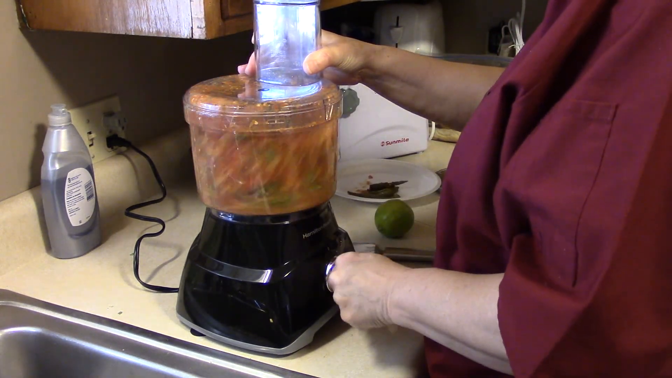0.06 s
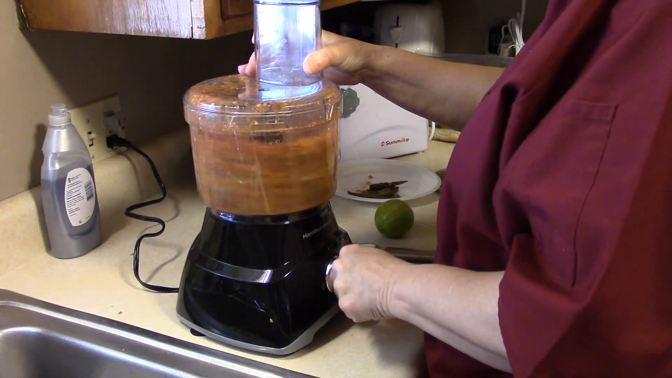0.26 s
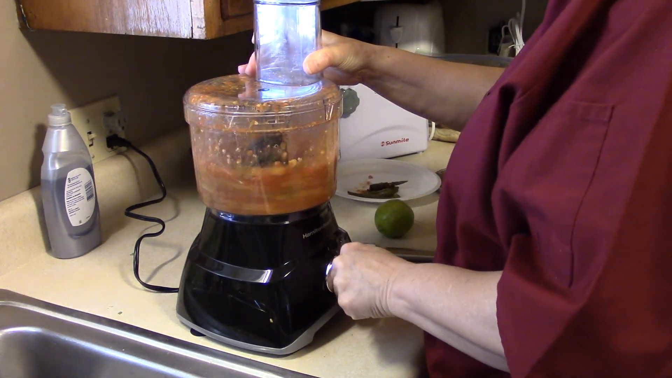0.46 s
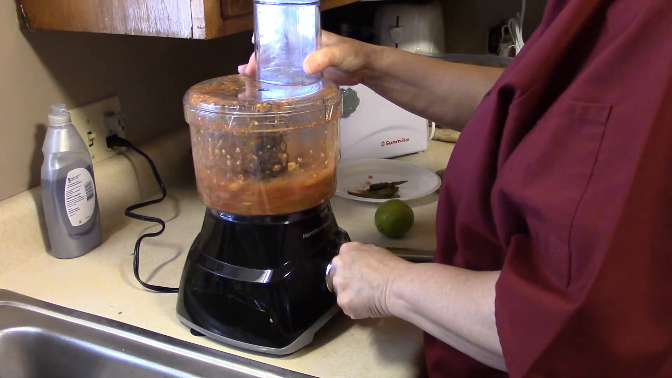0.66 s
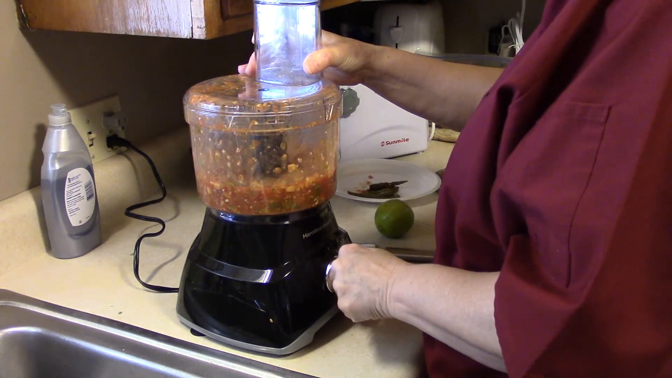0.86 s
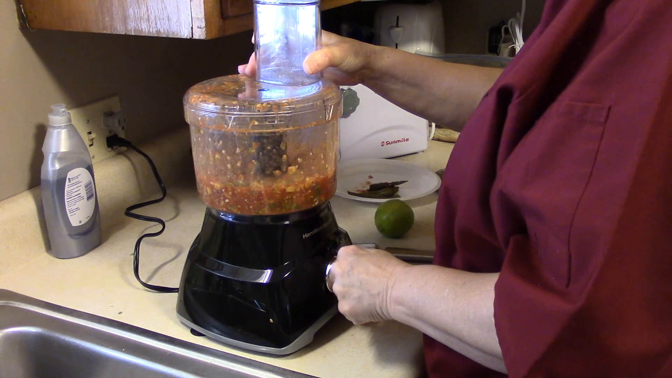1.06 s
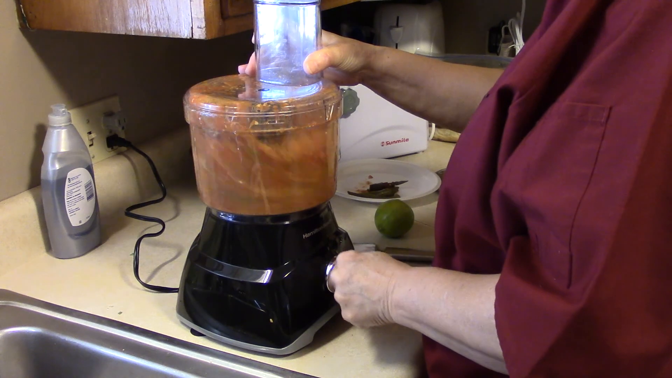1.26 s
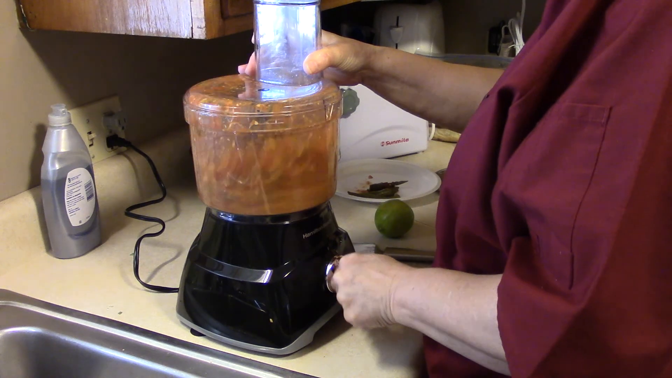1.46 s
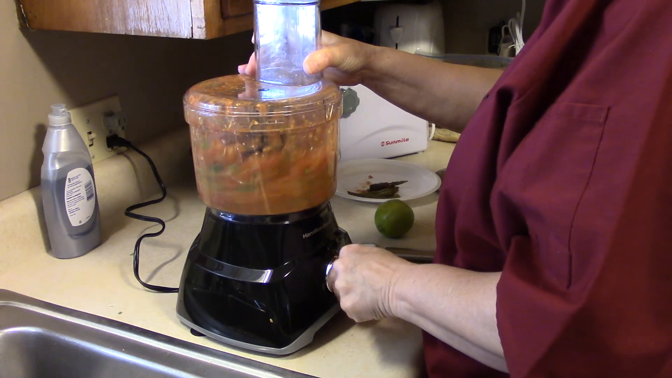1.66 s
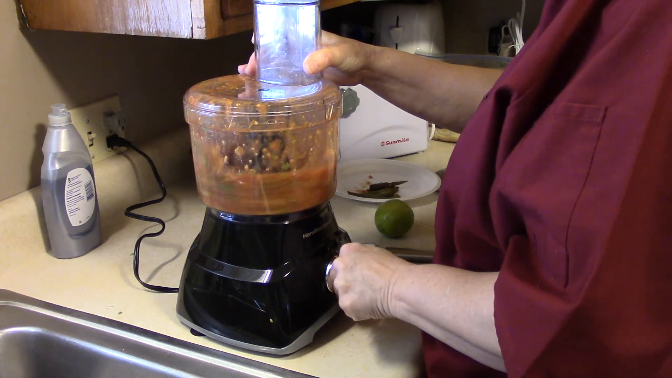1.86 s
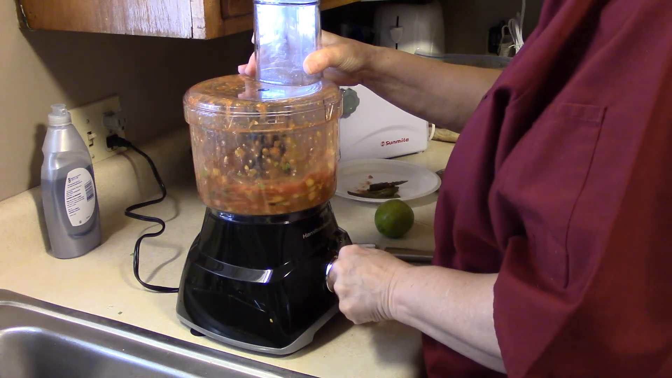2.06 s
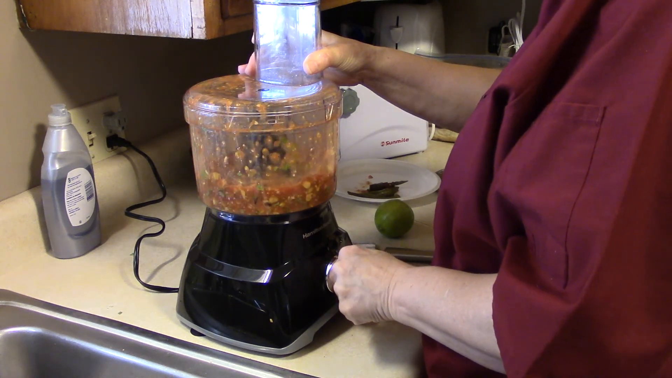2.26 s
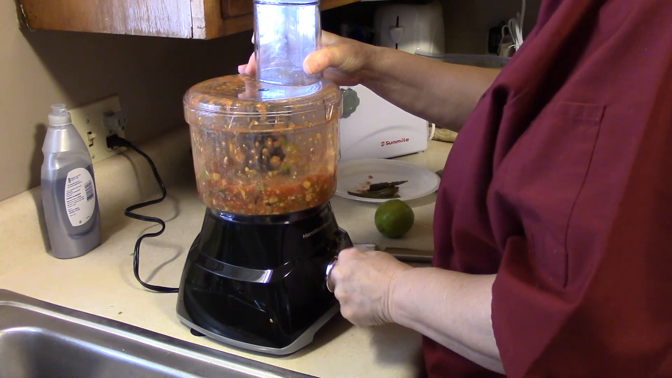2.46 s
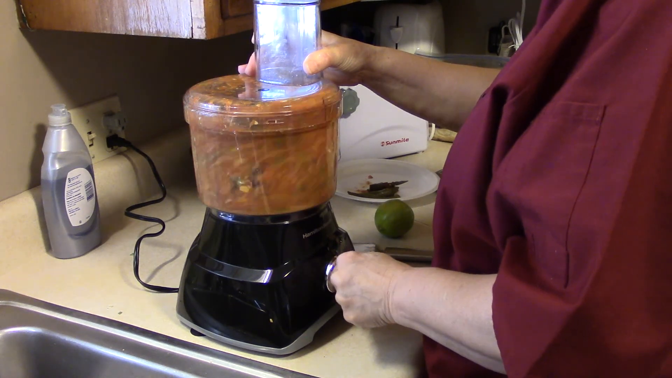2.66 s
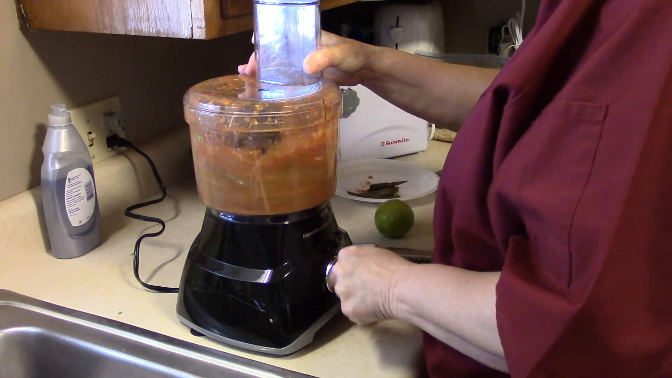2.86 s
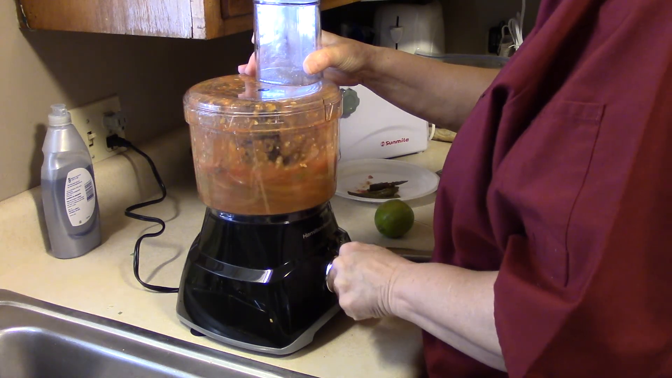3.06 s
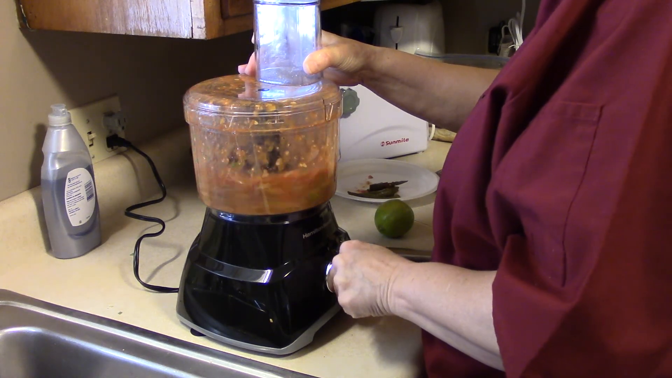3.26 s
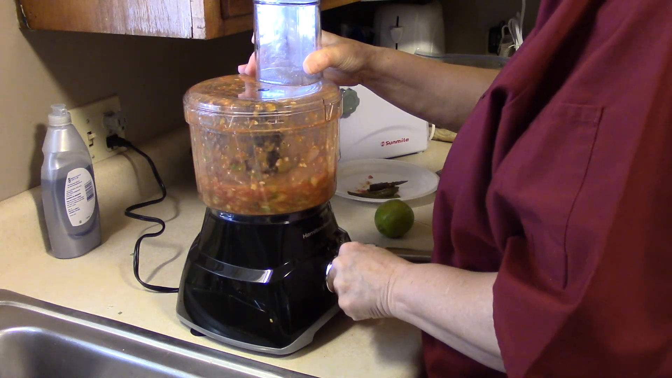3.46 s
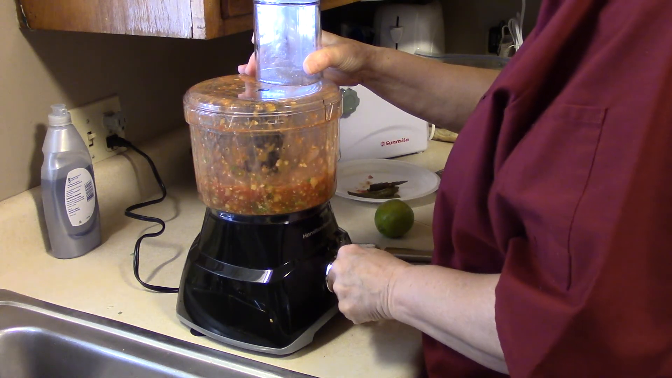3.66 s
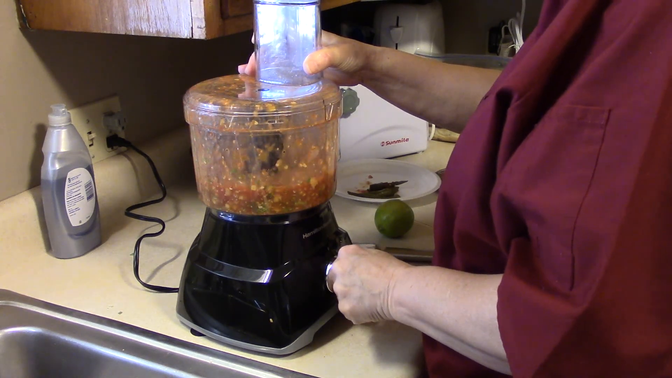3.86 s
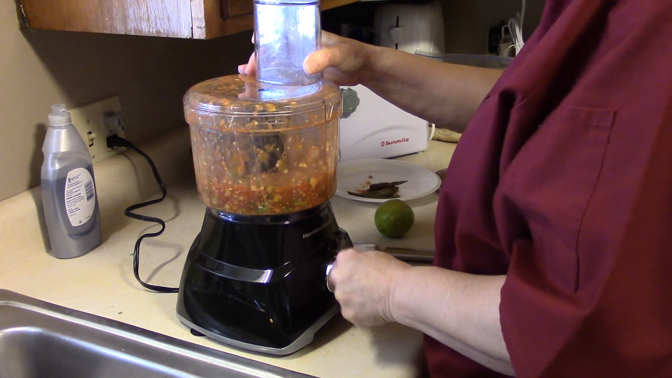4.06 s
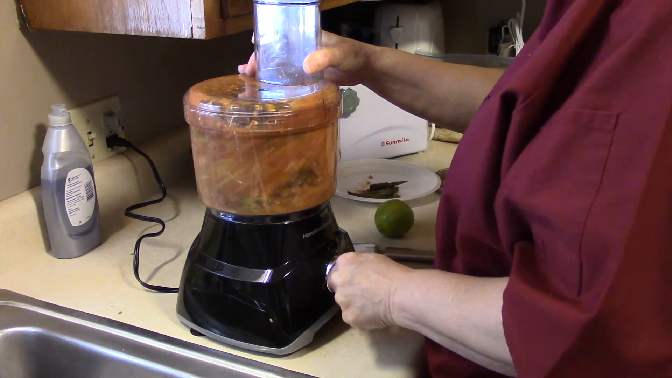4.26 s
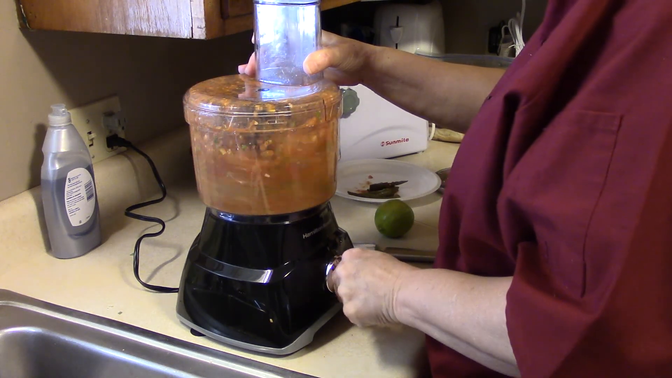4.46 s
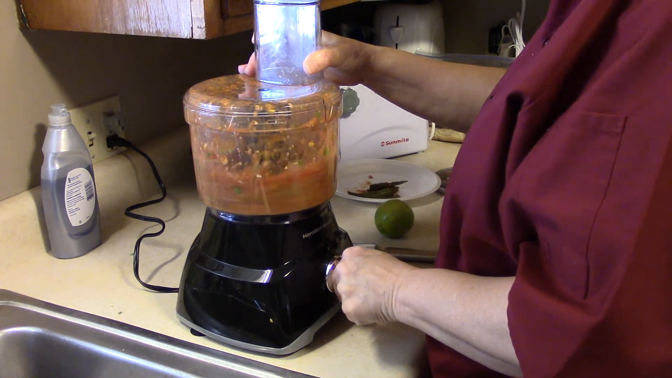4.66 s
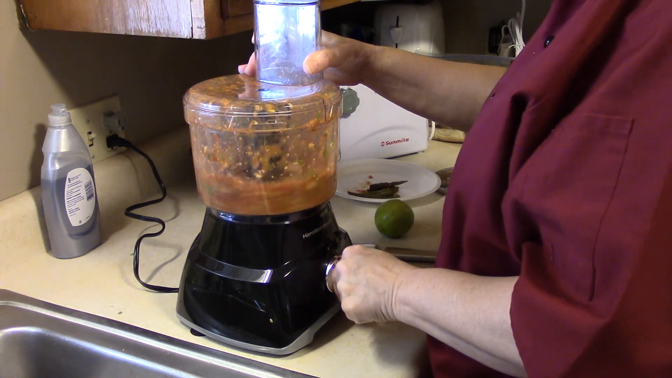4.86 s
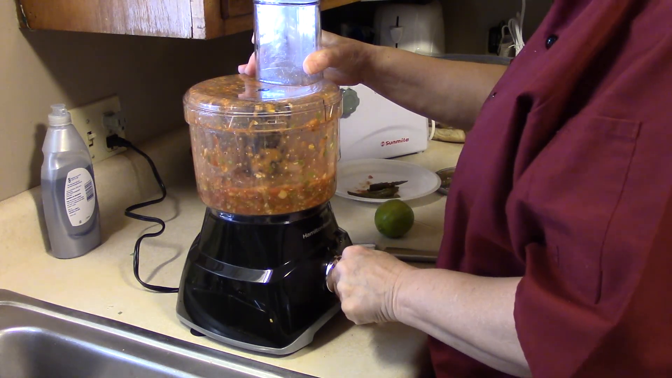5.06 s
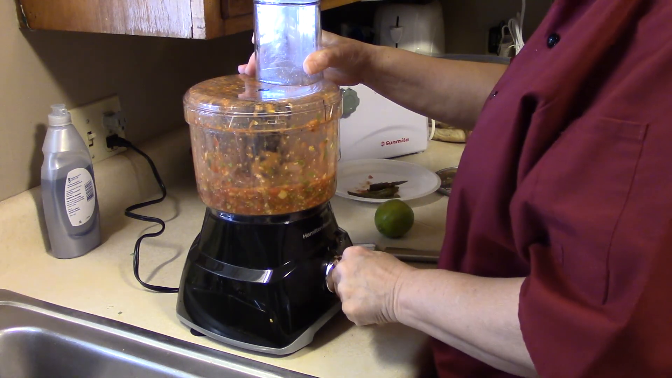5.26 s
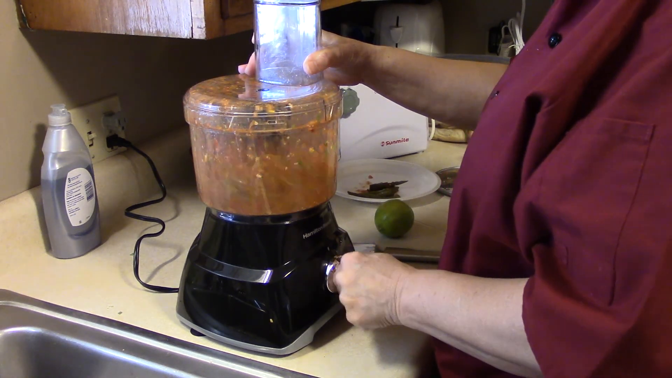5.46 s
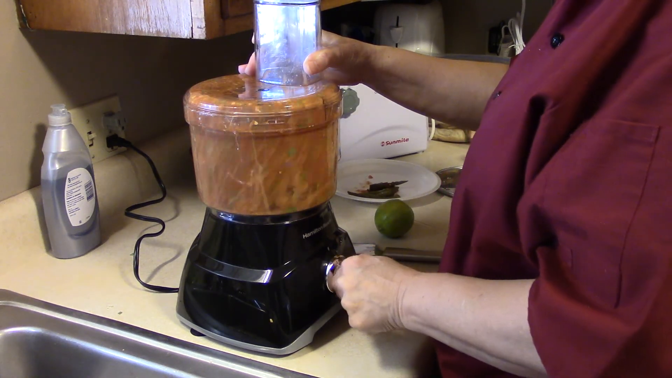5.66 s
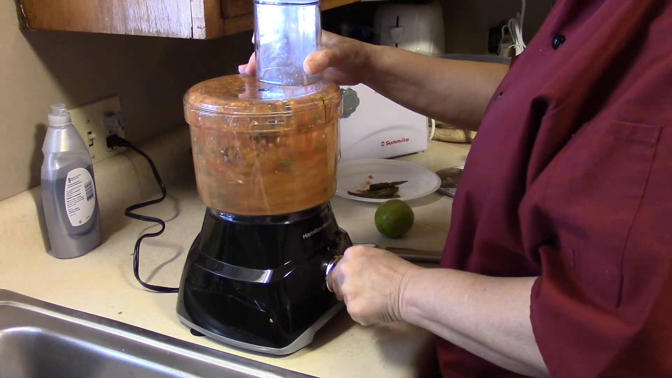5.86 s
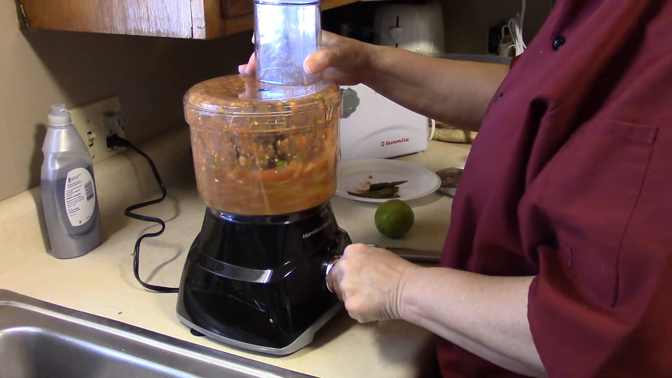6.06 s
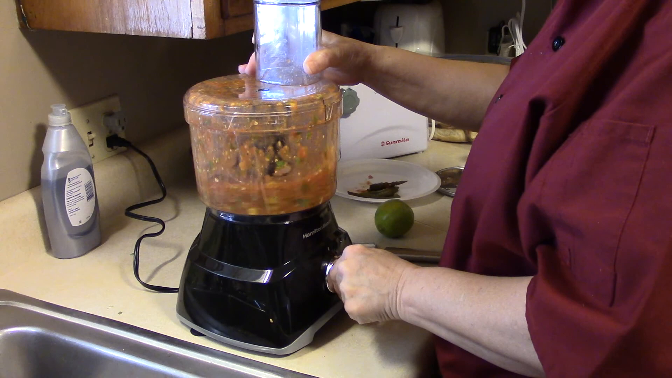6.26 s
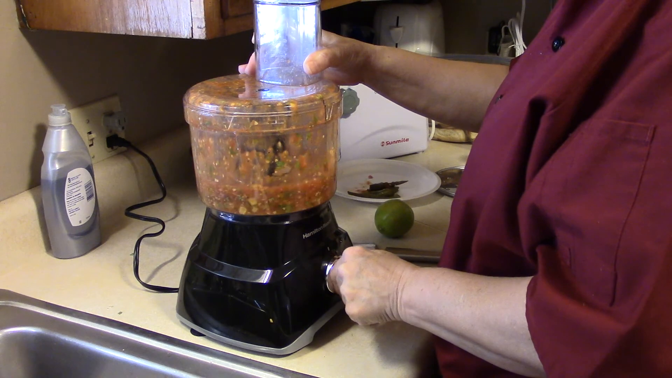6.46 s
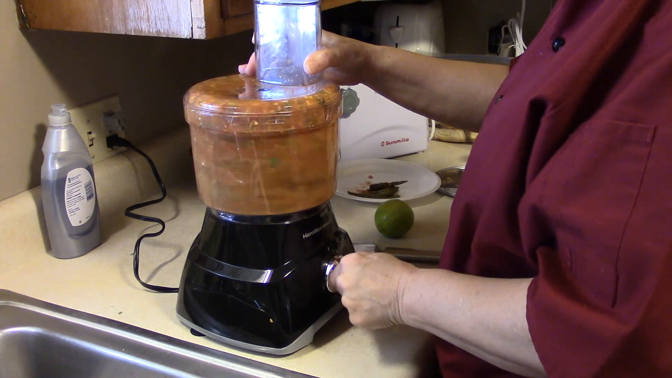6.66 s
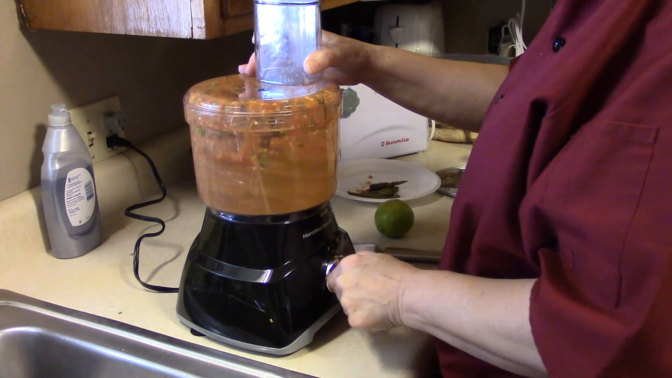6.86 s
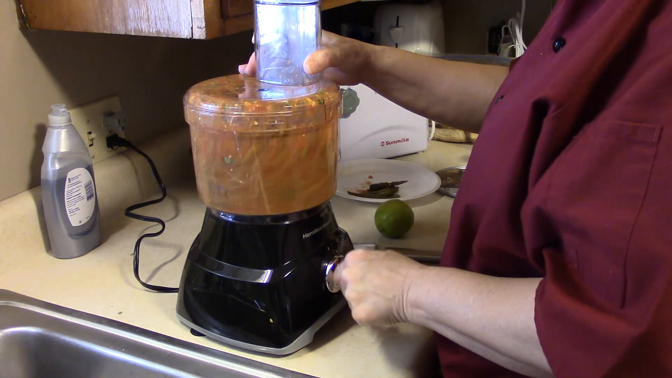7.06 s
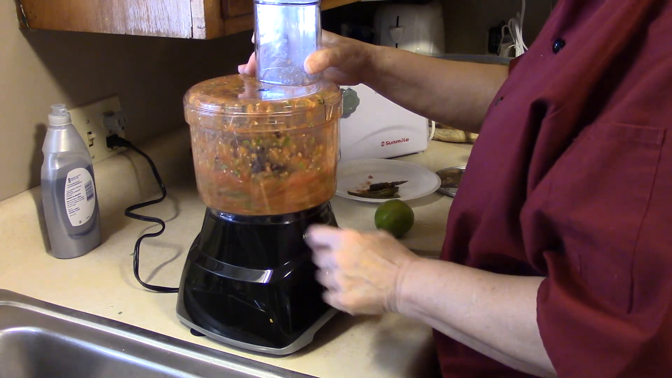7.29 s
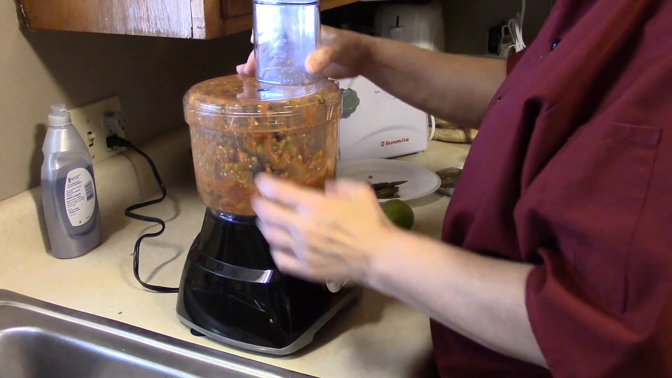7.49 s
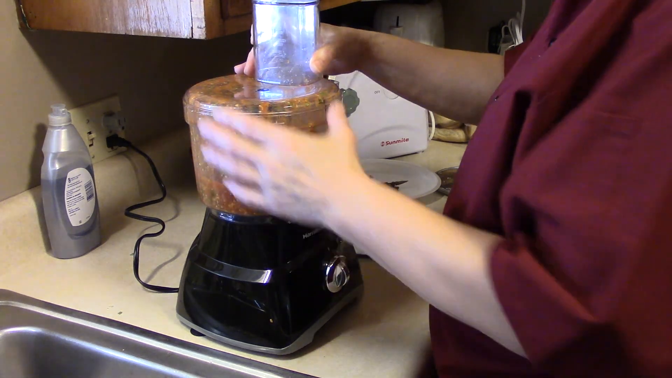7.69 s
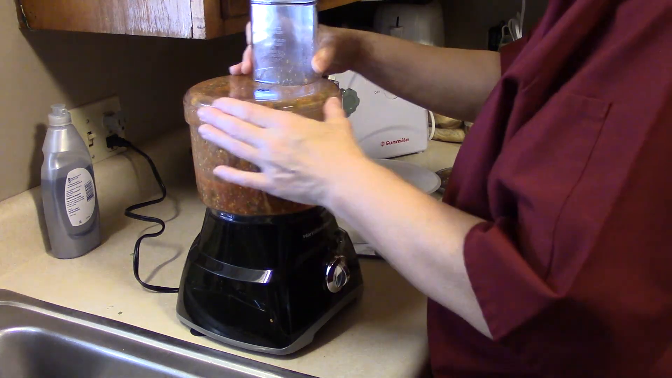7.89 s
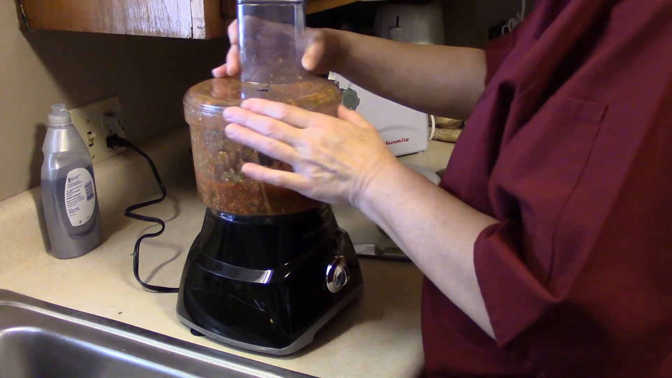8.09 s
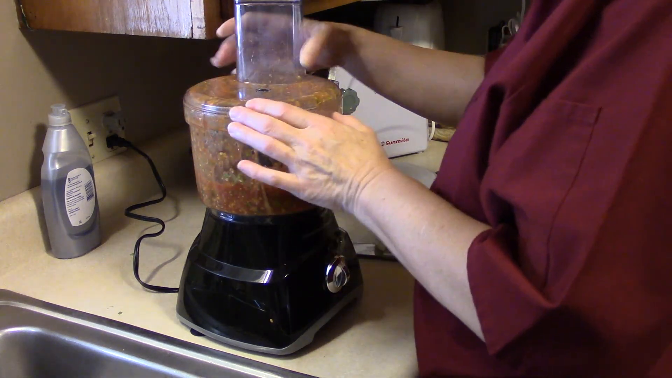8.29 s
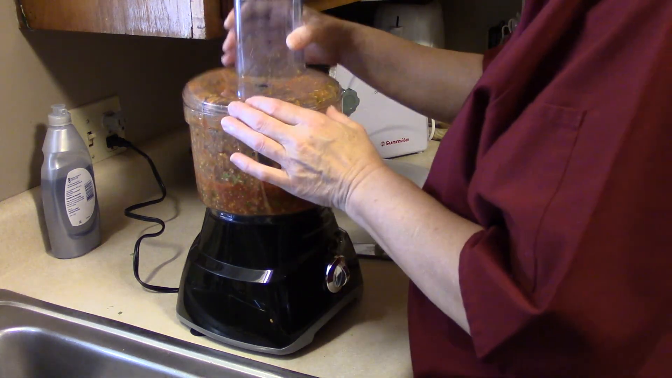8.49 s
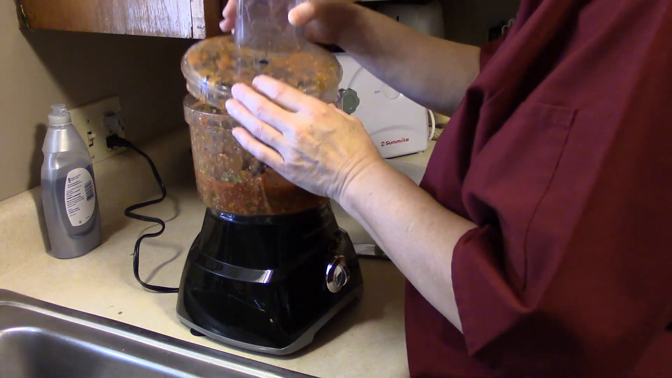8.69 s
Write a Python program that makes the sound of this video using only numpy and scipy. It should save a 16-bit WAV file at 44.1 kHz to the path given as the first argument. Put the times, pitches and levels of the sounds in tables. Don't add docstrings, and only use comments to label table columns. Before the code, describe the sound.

Loud pulses of a small geared motor, nearly centred and close, in a lightly reverberant kitchen. Each snaps on with a click and clack, roars and whines for about a quarter second, then grinds downward to rest with a soft thump. A low fridge hum and faint high whistles fill the gaps. After the sixth pulse come hollow plastic knocks, one sharp crack and short stuttering scrapes.

```python
import sys
import numpy as np
from scipy import signal
from scipy.fft import rfft, irfft, next_fast_len
from scipy.io import wavfile
from scipy.ndimage import uniform_filter1d

SR = 44100
rng = np.random.default_rng(int(sys.argv[2]) if len(sys.argv) > 2 else 0)


def volts_from_decibels(level):
    exponent = np.asarray(level, float) / 20
    return 10 ** exponent


def wav_record(signal):
    frames = np.transpose(np.atleast_2d(signal))
    bounded = np.clip(frames, -1, 1)
    quanta = np.round(bounded * 32767).astype(np.int16)
    wavfile.write(sys.argv[1], SR, quanta)


N = 384993
T = np.arange(N) / SR

# switch_on_s, switch_off_s, standstill_s
PULSES = [
    (-.15, .075, .67),
    (1.184, 1.385, 2.0),
    (2.484, 2.75, 3.36),
    (4.077, 4.292, 4.93),
    (5.435, 5.642, 6.296),
    (6.516, 6.805, 7.47),
]
# gear_db, food_db, starting_strain_db, tooth_whine_db, coasting_time_s
PULSE_LOADS = [
    (-0.3, -1, -4.7, -2.5, .3),
    (-1.1, -1.2, -1.8, -0.7, .3),
    (-0.85, -1.35, -2, -1.5, .33),
    (-2.23, -1.7, -1.5, -0.8, .31),
    (-0.5, -0.1, -1.9, -0.4, .38),
    (-1.7, -1.15, -1.2, -2, .38),
]
FREE_HZ, SPIN_UP_S = 383, .071
TEETH, MAINS_HZ = 10, 60
FOOD_FALLS_S, STRAIN_EASES_S = 0.087, 0.0051

# full_speed_db, speed_power, starting_strain_db
RUMBLE_LAW, GRIND_LAW, WHINE_LAW = (-22, 0.68, -17), (-13.5, 1.185, -9), (-13, .9, -3)
FLUNG_LAW, STIRRED_LAW = (-17, 1.45, -32), (-25.5, 1.23, -58.5)
# frequency_hz, density_db
RUMBLE_SPECTRUM = [(18, -73.5), (30, -52.5), (70, -16.5), (260, -8.5), (333, 2), (383, -0.5), (590, -0.5),
                   (829, -3), (1200, -2), (1560, -18), (2640, -120)]
# frequency_hz, density_db
GRIND_FAST = [(500, -33), (900, -15.5), (1500, -1.5), (2500, 2), (3500, 5), (4500, -3), (7000, -23.5)]
# frequency_hz, density_db
GRIND_NEAR_REST = [(500, -29.5), (900, -8), (1500, 5), (2300, 1), (3200, -7), (4500, -35.5), (7000, -34)]
# frequency_hz, density_db
SPRAY_SPECTRUM = [(2500, -20.5), (4300, -5.5), (6000, -1), (8000, -4.5), (10000, -7.5), (12500, -15),
                  (15000, -22), (17000, -48)]
# shaft_multiple, full_speed_db
UNBALANCE = [(1, -22)]
# offset_shaft_multiples (from the tooth rate), level_db, blur_hz
MESH_TONES = [(0, .8, 170), (-1.2, -1.5, 800)]
WHINE_CARRIES_HZ, CARRY_POWER = 1050, 3
GROAN_HZ, GROAN_DB, GROAN_BLUR_HZ, GROAN_POWER = 590, -13, 80, 3
# centre_hz, width_hz, lift_db
HOUSING_MODES = [(212, 58, 7.5), (295, 3.7, 4.5), (306, 25, -14), (477, 46, -2), (602.5, 20, 3.5),
                 (890, 20, -19), (1598, 43, 0.5), (1712, 43, -7), (2090, 20, -4), (2320, 110, -4),
                 (2501, 76, -0.5), (2963, 65, -3), (3510, 42, -7), (6000, 160, -11.5), (7010, 120, -6.5)]

# frequency_hz, density_db
DRONE_SPECTRUM = [(15, -71), (25, -39), (110, -10.5), (148, -15), (233, -4), (323, -14.5), (389, 0),
                  (434, -8), (483, -10), (685, -13.5), (1760, -27), (2300, -32), (5300, -40), (5750, -38.5),
                  (15600, -53)]
DRONE_DB = -42
# centre_hz, width_hz, level_db
FRIDGE_TONES = [(120.4, 5.2, -1), (185.6, 13, 0), (242, 9.4, 3), (299, 14, 0), (400.4, 10, -1.5),
                (595, 4.3, -6.5), (1750, 30, -14)]
# start_s, held_s, level_db
WHISTLES = [(.71, .065, -71), (.85, .055, -70.5), (.985, .07, -72), (1.075, .02, -75), (2.05, .055, -69.5),
            (2.19, 0.11, -72), (2.4, 0.034, -73.5), (3.456, .056, -75), (3.6, .31, -71),
            (5.188, .016, -84.5), (7.62, .08, -74), (7.79, .06, -70)]
WHISTLE_HZ, WHISTLE_EDGE_DB_S = 5561, 502.5

# start_s, peak_db
SETTLINGS = [
    (.662, -21.5),
    (.672, -29),
    (2.0, -18),
    (2.009, -28),
    (3.36, -23.5),
    (3.38, -29),
    (4.92, -26),
    (6.296, -23),
    (6.308, -26),
    (7.352, -30),
]
# start_s, peak_db
KNOB_TICKS_AT = [
    (1.125, -42),
    (1.156, -35),
    (2.444, -34),
    (4.027, -32.5),
    (4.05, -34.5),
    (5.2, -52.5),
    (5.327, -36),
    (6.456, -34.5),
]
# start_s, peak_db
SWITCH_CONTACTS = [
    (1.173, -29.5),
    (1.18, -20),
    (2.47, -31),
    (4.066, -30.5),
    (4.072, -24),
    (5.42, -30.5),
    (6.491, -38.5),
    (6.504, -29.5),
]
# start_s, peak_db
GEAR_CLACKS = [
    (1.182, 1.9),
    (2.483, 1.6),
    (4.075, 0.37),
    (5.433, 0.87),
    (6.516, 0.63),
]
# thud_db, crack_db, t60_s
TICK, RATTLE, CLACK, SETTLE = (-18.5, -5.5, .06), (-7.5, -5, .115), (-6.5, -6.5, 0.054), (0, -40, .04)
CRACK_DIES_FASTER = 1.6
# centre_hz, width_hz, level_db
COUNTER_MODES = [(446, 80, -1), (597, 110, 7), (780, 170, -1)]
# centre_hz, width_hz, level_db
COUPLING_MODES = [(600, 250, -9), (858, 250, -7.5)]
# centre_hz, width_hz, level_db
KNOB_MODES = [(1280, 660, 7.5), (1750, 180, 3), (2360, 340, -4.5)]
# centre_hz, width_hz, level_db
BASE_MODES = [(1120, 250, -2), (1600, 56, -6), (2247, 160, 7.5), (2760, 930, 5.5)]
# frequency_hz, density_db
CRACK_SPECTRUM = [(1200, -21.5), (2500, 2.5), (6500, -1), (10000, -11.5), (13000, -21), (17000, -29.5)]

# start_s, peak_db, thud_db, crack_db
PUSHER_KNOCKS = [(7.5, -15.5, -18, -11.5), (7.543, -24, -8, -12.5), (7.554, -15, -13.5, -22.5),
                 (7.73, -30, -15.5, -21), (7.893, -35, -0.5, -19), (7.929, -16, -24, -11),
                 (7.941, -4, -28, -9.5), (7.956, -17, -5.5, -1.5), (7.983, -18.5, -15, -2.5),
                 (8.002, -19, -15, -6.5), (8.194, -12.5, -8.5, -20.5), (8.211, -22, -13, -14),
                 (8.254, -25.5, -12, -25), (8.3, -27, -6, -21), (8.358, -40, 4, -25),
                 (8.427, -30.5, -4, -27.5), (8.462, -28, -4, -21.5), (8.478, -14.5, -17, -26),
                 (8.508, -17, -12, -24), (8.541, -22, -15, -13), (8.567, -23, -14, -4.5),
                 (8.609, -23, -17, -25)]
PUSHER_T60_S = .07
# centre_hz, width_hz, level_db
TUBE_MODES = [(965, 160, -2.5), (1306, 140, -0.5), (1583, 280, -4), (1860, 49, 0.5), (2470, 300, -18),
              (2776, 180, -15)]
# frequency_hz, density_db
RASP_SPECTRUM = [(1200, -30.5), (2200, 5.5), (3800, -1), (5500, -0.5), (7500, -5.5), (10000, -7.5),
                 (13000, -16.5), (17000, -23)]
# start_s, held_s, body_db, rasp_db
SLIDES = [
    (8.2, .02, -33, -50),
    (8.24, .14, -43, -58),
    (8.425, .035, -43, -60),
    (8.465, .07, -35, -51),
    (8.535, .095, -38, -45),
    (8.64, .08, -48, -56),
]
SLIDE_RISE_DB_S, SLIDE_FALL_DB_S = 1502.5, 387

# frequency_hz, t60_s
ROOM_T60 = [(150, 0.56), (1000, 0.59), (4000, 0.47), (12000, 0.31)]
# frequency_hz, side_minus_mid_db
PORT_DIFFERENCE = [(60, -15.5), (110, -15), (200, -23), (380, -24), (700, -21.5), (1290, -20.5),
                   (2380, -18), (4400, -17), (8120, -15), (15000, -10.5)]


def unit(x):
    return x / np.sqrt(np.mean(x ** 2) + 1e-20)


def along(points, hz):
    f, v = np.transpose(points)
    return np.interp(np.log(hz + 1), np.log(f + 1), v)


def filtered(x, response):
    m = next_fast_len(x.shape[-1] + 8192, real=True)
    return irfft(rfft(x, m) * response(np.fft.rfftfreq(m, 1 / SR)), m)[..., :x.shape[-1]]


def noise(spectrum, size=N):
    return unit(filtered(rng.standard_normal(size), lambda hz: volts_from_decibels(along(spectrum, hz))))


def wobble(rate):
    knots = rng.standard_normal(int(N * rate / SR) + 4)
    at = T * rate
    k = at.astype(int)
    return unit(knots[k] + (knots[k + 1] - knots[k]) * (1 - np.cos(np.pi * (at - k))) / 2)


def blurred(hz, blur_hz):
    turn = 2 * np.pi * np.cumsum(hz * np.ones(N)) / SR
    return wobble(blur_hz) * np.cos(turn) + wobble(blur_hz) * np.sin(turn)


def modes(table):
    return lambda f: sum(volts_from_decibels(db) * 1j * f * w / (c * c - f * f + 1j * f * w) for c, w, db in table)


def dulled(table, over=1.32):
    edge = over * table[-1][0]
    return lambda f: modes(table)(f) / (1 + 1.4j * f / edge - (f / edge) ** 2) ** 2


def swells(rows, rise_db_s, fall_db_s):
    first = max(round((rows[0][0] - .5) * SR), 0)
    t = T[first:]
    top = np.full((len(rows[0]) - 2, len(t)), -140.)
    for s, held, *db in rows:
        before = np.clip(rise_db_s * (s - t), 0, None)
        after = np.clip(fall_db_s * (t - s - held), 0, None)
        top = np.maximum(top, np.array(db)[:, None] - (before + after))
    return np.pad(volts_from_decibels(top), ((0, 0), (first, 0)))


def shaft():
    hz, powered, aloft, load = np.zeros(N), np.zeros(N), np.zeros(N), np.zeros((4, N))
    for (on, off, still), (*db, coast) in zip(PULSES, PULSE_LOADS):
        rise = FREE_HZ * (1 - np.exp(-np.clip(np.minimum(T, off) - on, 0, None) / SPIN_UP_S))
        since_off = np.clip(T - off, 0, None)
        fade = np.exp(-since_off / coast)
        end = np.exp(-(still - off) / coast)
        hz += rise * np.clip((fade - end) / (1 - end), 0, 1)
        powered += (T > on) * (T < off)
        aloft += (T > on) / (1 + (since_off / FOOD_FALLS_S) ** 1.8)
        load[:, T > on] = volts_from_decibels(np.array(db))[:, None]
    return hz, powered, aloft, load


def gear_whine(hz, speed, powered, aloft, mesh):
    teeth = sum(volts_from_decibels(db) * blurred((TEETH + k) * hz, blur_hz) for k, db, blur_hz in MESH_TONES)
    teeth *= volts_from_decibels(2.4 * wobble(45) - .5)
    driven_db = -4.0 * uniform_filter1d(powered, size=1500) * speed
    slack_db = -2 * (1.5 - np.clip(aloft, 0, 1))
    teeth *= volts_from_decibels(driven_db + slack_db)
    return teeth * mesh / (1 + (WHINE_CARRIES_HZ / (TEETH * hz + 1)) ** CARRY_POWER)


def unbalance(turn, speed, aloft):
    tones = sum(volts_from_decibels(db + 2.2 * wobble(25)) * np.sin(k * turn + .25 * wobble(20)) for k, db in UNBALANCE)
    return tones * speed ** 3.5 * np.clip(aloft, .3, 1)


def housing(x):
    return filtered(x, lambda f: 1 + modes(HOUSING_MODES)(f))


def machine():
    hz, powered, aloft, (gears, food, start, mesh) = shaft()
    speed = np.clip(hz / FREE_HZ, 0, 1)
    torque = uniform_filter1d(powered * (1 - speed), size=round(STRAIN_EASES_S * SR))
    strain = start * np.abs(torque) * powered

    def law(db, power, strain_db):
        return volts_from_decibels(db) * speed ** power + volts_from_decibels(strain_db) * strain

    turn = 2 * np.pi * np.cumsum(hz) / SR
    ripple = 1 + 0.11 * powered * np.cos(2 * 2 * np.pi * MAINS_HZ * T)
    clatter = 1 + 0.067 * np.cos(turn)
    lumps = volts_from_decibels(1.0 * wobble(90))

    rumble = gears * law(*RUMBLE_LAW) * noise(RUMBLE_SPECTRUM)
    rumble *= volts_from_decibels(0.3 * wobble(30) + 1.5 * wobble(9.9))

    bright = speed ** 1.8
    grind = np.sqrt(bright) * noise(GRIND_FAST) + np.sqrt(1 - bright) * noise(GRIND_NEAR_REST)
    grind *= volts_from_decibels(-3.5) * gears * law(*GRIND_LAW) * clatter * lumps

    spray = volts_from_decibels(-2.0) * food * (aloft * law(*FLUNG_LAW) + law(*STIRRED_LAW)) * noise(SPRAY_SPECTRUM)
    spray *= clatter * lumps * volts_from_decibels(0.1 * wobble(400))

    groan = volts_from_decibels(GROAN_DB) * strain ** GROAN_POWER * blurred(GROAN_HZ, GROAN_BLUR_HZ)
    whine = volts_from_decibels(-8.5) * law(*WHINE_LAW) * gear_whine(hz, speed, powered, aloft, mesh)
    overtone = volts_from_decibels(-28.5) * speed ** 12 * blurred(2 * TEETH * hz, blur_hz=121)
    driven = ripple * (rumble + grind + spray + groan + whine + overtone)
    return housing(driven + unbalance(turn, speed, aloft))


def fridge():
    drone = volts_from_decibels(DRONE_DB - 5.5 + 0.29 * wobble(13)) * noise(DRONE_SPECTRUM)
    tones = volts_from_decibels(-49.0) * unit(filtered(rng.standard_normal(N), dulled(FRIDGE_TONES)))
    fuzzy_whine = volts_from_decibels(-76) * blurred(6960, blur_hz=330)
    whistle_gain = volts_from_decibels(2.0) * swells(WHISTLES, WHISTLE_EDGE_DB_S, WHISTLE_EDGE_DB_S)[0]
    return drone + tones + fuzzy_whine + whistle_gain * np.sin(2 * np.pi * WHISTLE_HZ * T)


def alike(events, kind):
    return [(*row, *kind) for row in events]


def knocks(events, body, edge, trim_db):
    s, db, thud_db, crack_db, t60 = np.transpose(events)[:, :, None]
    t = np.arange(SR // 4) / SR
    fall_db = -60 * t / t60
    rise = volts_from_decibels(db + trim_db) * (1 - np.exp(-t / 0.0013))
    thud, knock, crack = rng.standard_normal((len(events), 3, len(t))).transpose(1, 0, 2)
    thud = filtered(thud * rise * volts_from_decibels(thud_db + 24.5 + fall_db), dulled(COUNTER_MODES))
    knock = filtered(knock * rise * volts_from_decibels(10.5 + fall_db), dulled(body))
    crack = unit(filtered(crack, lambda hz: volts_from_decibels(along(edge, hz))))
    crack = crack * rise * volts_from_decibels(crack_db + 5.0 + CRACK_DIES_FASTER * fall_db)
    rows = thud + knock + crack
    at = np.round(s * SR).astype(int) + np.arange(len(t))
    return np.bincount(at.ravel(), rows.ravel(), minlength=N)[:N]


def coupling_settles():
    return knocks(alike(SETTLINGS, SETTLE), COUPLING_MODES, CRACK_SPECTRUM, trim_db=-12.0)


def switch_clicks():
    clicks = alike(KNOB_TICKS_AT, TICK) + alike(SWITCH_CONTACTS, RATTLE)
    return knocks(clicks, KNOB_MODES, CRACK_SPECTRUM, trim_db=-4.5)


def gears_take_up():
    return knocks(alike(GEAR_CLACKS, CLACK), BASE_MODES, CRACK_SPECTRUM, trim_db=-14)


def pusher_knocks():
    return knocks(alike(PUSHER_KNOCKS, [PUSHER_T60_S]), TUBE_MODES, RASP_SPECTRUM, trim_db=-9)


def pusher_drag():
    body_gain, rasp_gain = swells(SLIDES, SLIDE_RISE_DB_S, SLIDE_FALL_DB_S)
    slips = volts_from_decibels(2.6 * wobble(89))
    body = unit(slips * filtered(rng.standard_normal(N), dulled(COUNTER_MODES[1:] + TUBE_MODES)))
    rasp = unit(slips * noise(RASP_SPECTRUM))
    return volts_from_decibels(-5.5) * body_gain * body + volts_from_decibels(-6.5) * rasp_gain * rasp


def kitchen(x):
    hz, t, z = signal.stft(rng.standard_normal((2, SR // 2)), SR, nperseg=256)
    decay = volts_from_decibels(-60 * t / along(ROOM_T60, hz)[:, None])
    tail = signal.istft(z * decay, SR, nperseg=256)[1]
    delayed = np.pad(x, (200, 0))[None]
    return signal.fftconvolve(delayed, tail / np.linalg.norm(tail[0]), axes=1)[:, :N]


def scene():
    near = machine() + coupling_settles() + switch_clicks() + gears_take_up() + pusher_knocks() + pusher_drag()
    near = filtered(near, lambda hz: (1j * hz / (1j * hz + 90)) ** 4)
    answer, other = kitchen(near)
    mid = volts_from_decibels(-3.0) * near + volts_from_decibels(-13.5) * answer + fridge()
    apart = other + volts_from_decibels(DRONE_DB) * noise(DRONE_SPECTRUM)
    side = filtered(apart, lambda hz: volts_from_decibels(along(PORT_DIFFERENCE, hz) - 6.0))
    return np.array([volts_from_decibels(4.5) * mid + side, volts_from_decibels(4.0) * mid - side])


def top_cut(x):
    return signal.sosfilt(signal.butter(12, 15710, fs=SR, output="sos"), x)


def record(dry):
    held = dry / (1 + np.abs(dry / .9) ** 7) ** (1 / 7)
    mix = filtered(held, lambda hz: (1j * hz / (1j * hz + 25)) ** 2)
    return top_cut(mix)


dry = scene()
out = record(dry)
wav_record(out)
```